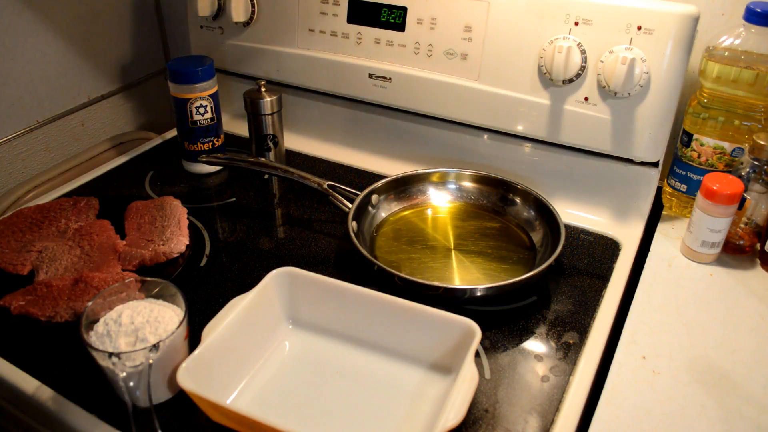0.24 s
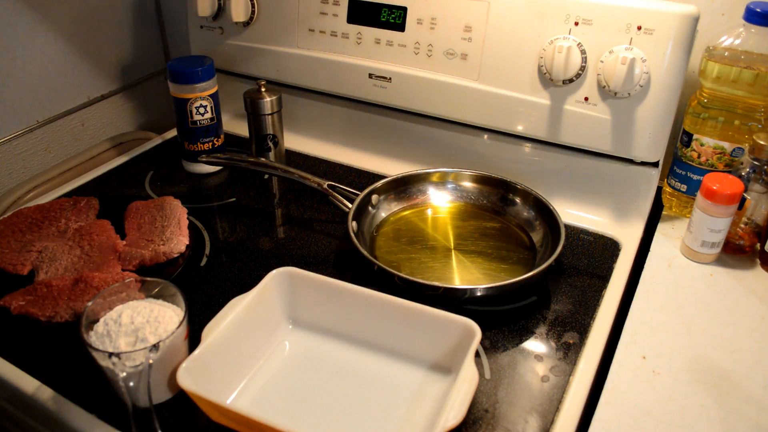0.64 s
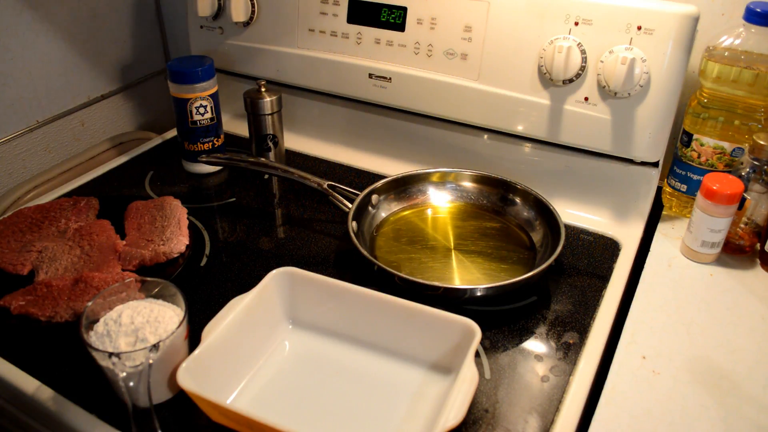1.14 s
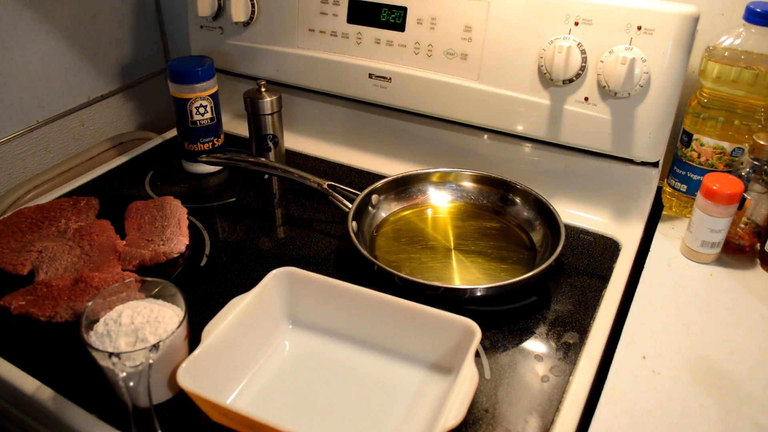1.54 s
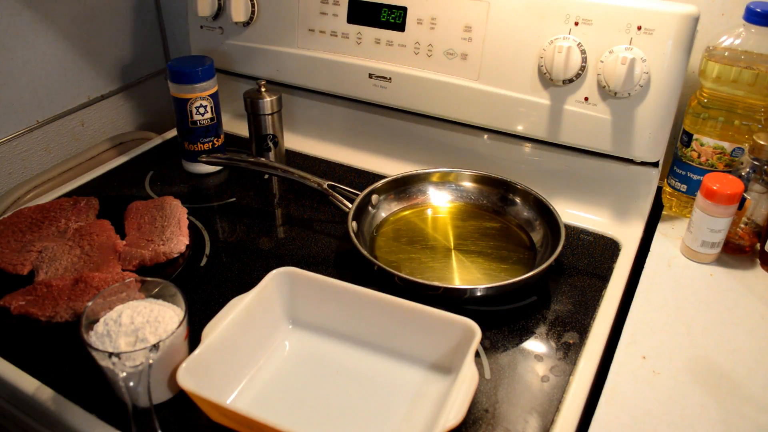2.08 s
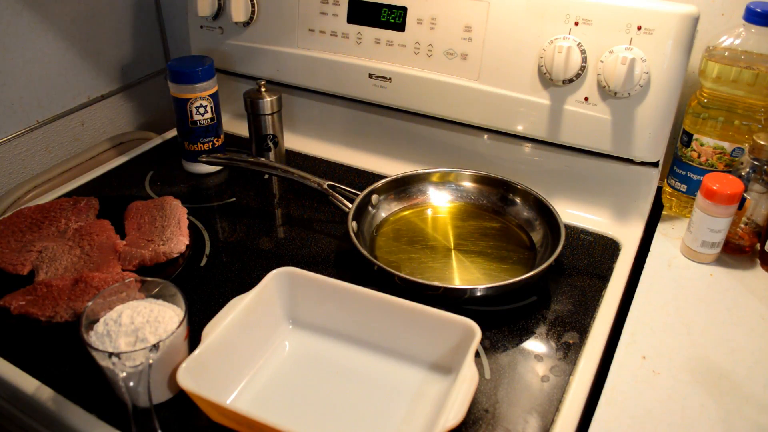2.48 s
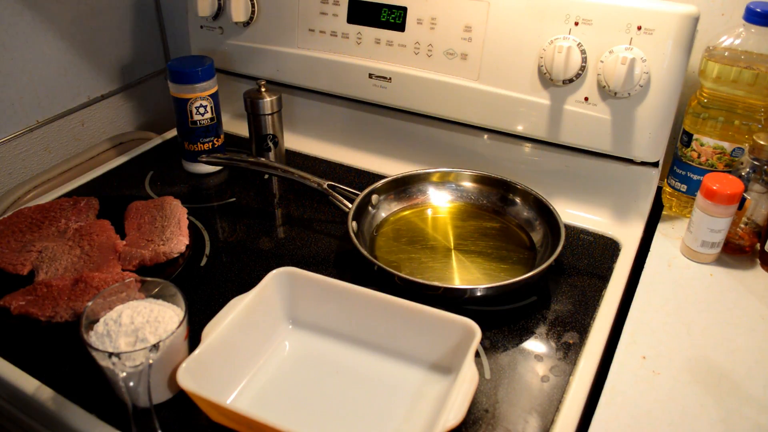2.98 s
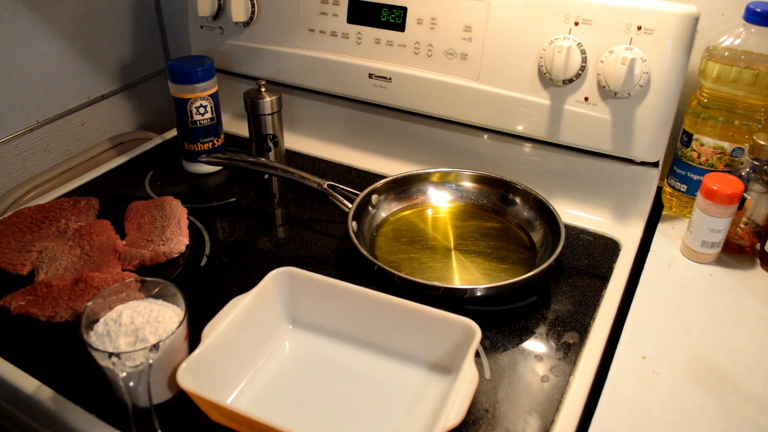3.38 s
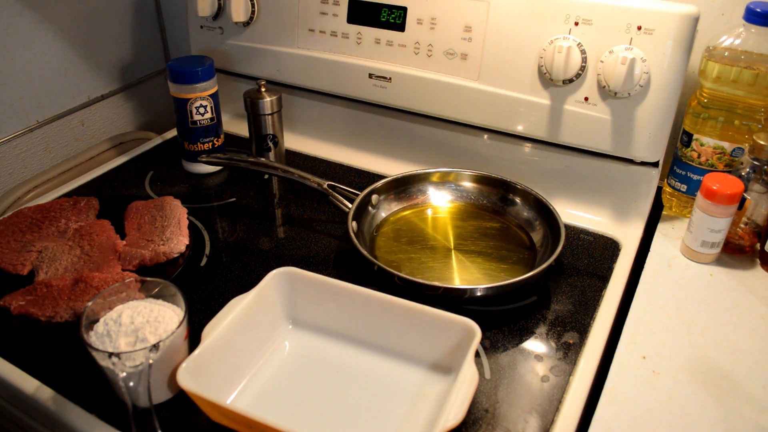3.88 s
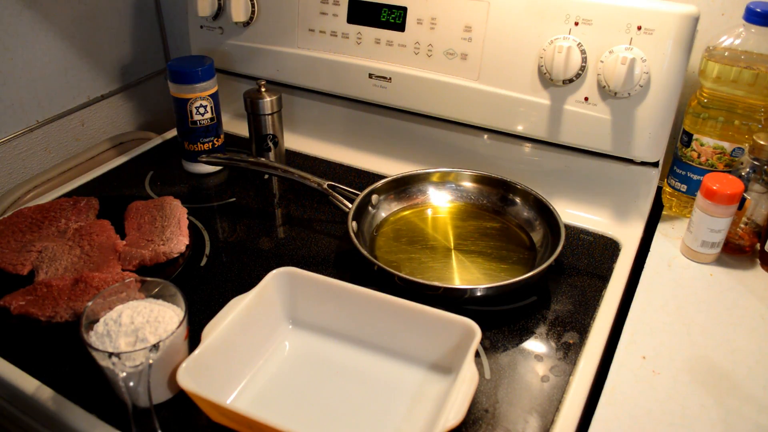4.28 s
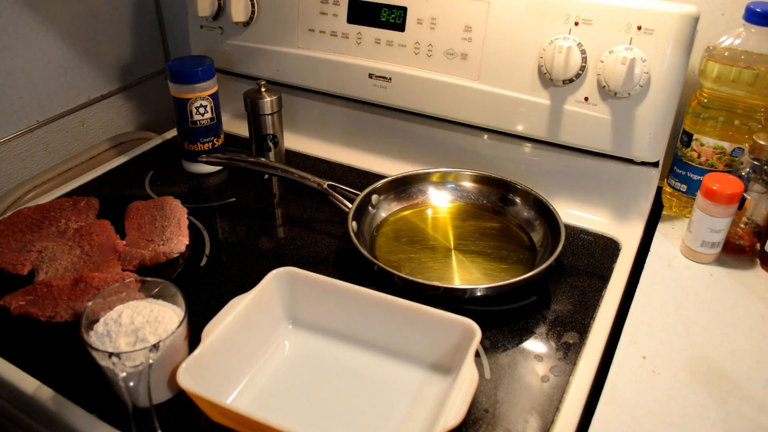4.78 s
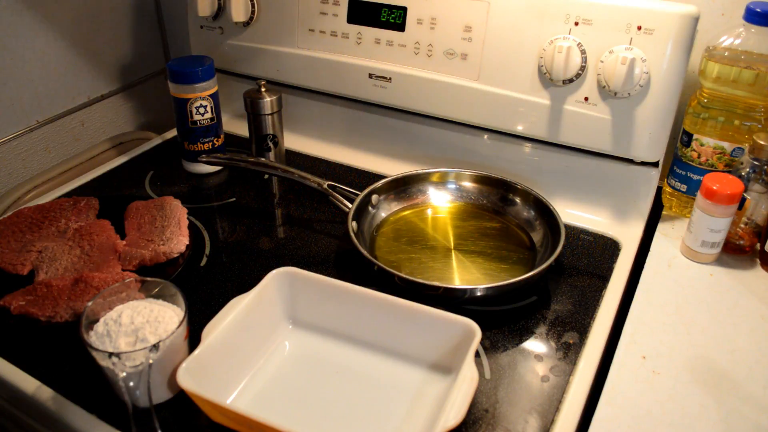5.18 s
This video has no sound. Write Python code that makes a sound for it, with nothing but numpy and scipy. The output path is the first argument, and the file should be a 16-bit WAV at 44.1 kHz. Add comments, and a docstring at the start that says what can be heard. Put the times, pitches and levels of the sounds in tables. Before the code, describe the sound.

A low appliance hum with a very faint hiss runs throughout a small, hard-surfaced kitchen. From 0 to 1.5 s a hand or cloth brushes in short strokes and a drawer rolls open with soft rumbling and dull wooden bumps, plus one faint clink near 0.9 s. After a short lull, cutlery crashes at about 1.83 s: dense, bright steel clatter with wooden knocks, loudest near 1.9 s and slightly distorted, jangling on until 2.3 s. Another tangle of clinks and knocks comes from 2.55 to 2.8 s. At 3.13 s a utensil is laid down with a dull double tap. Harder clacks on wood follow at 3.37, 3.54 and 3.78 s, then a sharp tick at 4.07 s and lighter, ringing clinks until 4.3 s. A faint deeper hum joins around 4 s. From 4.7 s only gentle rubbing and small dry ticks remain, close to the microphone.

```python
"""A small, hard kitchen where an appliance hums: a hand brushes about, a cutlery drawer rolls open, and
forks and spoons are stirred, dropped and knocked against its wooden tray.
Noise bursts and random tiny contacts drive steel and wood resonances; shaped noise makes the hum, hiss
and cloth. Sparse echoes add the room, and the loudest crash overloads."""
import sys
import numpy as np
from scipy import signal
from scipy.fft import rfft, irfft, next_fast_len
from scipy.io import wavfile

SR = 44100
rng = np.random.default_rng(int(sys.argv[2]) if len(sys.argv) > 2 else 0)


def file_out(sig):
    """Save sig as 16-bit WAV at sys.argv[1]."""
    # one column per channel
    cols = np.atleast_2d(sig).T
    # limit, then scale
    lim = np.clip(cols, -1, 1)
    pcm = np.round(lim * 32767).astype(np.int16)
    wavfile.write(sys.argv[1], SR, pcm)


N = 239264

# All source levels are relative: the functions below trim them in the mix.
# Appliance hum spectrum. Each row: frequency in Hz, density in relative dB per Hz.
HUM_SPECTRUM = [(12, -55), (20, -18.5), (87, -2.5), (124, -10.5), (181, -2), (393, -5.5), (427, -10),
                (663, -8), (736, -12.5), (1030, -9.5), (1270, -15.5), (3000, -26.5), (3900, -64),
                (6600, -120)]
# Faint steady hiss spectrum. Each row: frequency in Hz, density in relative dB per Hz.
AIR_SPECTRUM = [(1760, -35), (3000, -11), (3510, -4.5), (4890, -12.5), (9260, -14), (9980, -13.5),
                (11000, -17), (15500, -22.5)]
HUM_DB, AIR_DB = -45.5, -60.5
LATE_HUM_HZ, LATE_HUM_WIDTH_HZ, LATE_HUM_DB = 95.5, 4.6, -58
LATE_HUM_FROM_S, LATE_HUM_RISE_S = 3.9, .4
# Decay of the room. Each row: frequency in Hz, time to fall 60 dB in seconds.
ROOM_DECAY = [(200, 0.26), (1000, 0.25), (4000, 0.26), (10000, 0.2), (15000, 0.25)]

# Soft strokes of hand and cloth, and the drawer's roll. Each row: top in seconds, hiss level in dB,
# build-up in ms per 20 dB, fading in ms per 20 dB, hold in ms, rumble against hiss in dB, brightness in dB.
RUBS = [(0.076, -42.5, 18, 140, 1, -4, -4.5), (0.239, -34, 54, 162, 1, -10, -3.5),
        (0.365, -53, 40, 47, 7.8, -8, 7), (0.44, -34.5, 29, 29, 50, -27, 1.5),
        (0.56, -64.5, 60, 60, 120, 18.5, 2), (0.69, -39.5, 8, 100, 20, -2, -7),
        (0.74, -44, 28, 150, 30, 6.5, -6), (0.866, -31.5, 48, 198, 1, 3.5, -2.5),
        (0.9, -40, 67, 120, 257, 9, 2), (1.22, -40, 86, 64.5, 237, 7.5, 2.5),
        (1.5, -51, 40, 57, 32, -2, 1.5), (4.7, -62, 20, 60, 18, -11, 4), (4.77, -56.5, 42, 60, 97, -9.5, 4),
        (4.886, -40.5, 64, 29, 0.89, -4.5, -10.5), (5.014, -40.5, 107, 34, 1, -18, -7.5),
        (5.067, -41.5, 22, 90, 11, -25, -1), (5.156, -47.5, 26, 100, 1, 3, 3),
        (5.35, -48.5, 192, 48, 1, -8, -7)]
# Bright spectrum of rubs, ticks and scuffs. Each row: frequency in Hz, density in relative dB per Hz.
SWISH = [(530, -35), (900, -35.5), (1200, -1), (2360, -2.5), (3180, -2), (3540, -2), (4770, -2.5),
         (7150, -7), (10100, -4), (15500, -33.5)]
# A utensil is laid down and rocks once. Each row: time in seconds, level in dB, chatter decay in ms.
SET_DOWN = [(3.129, -23, 19.2), (3.159, -26.5, 6.4)]
# Modes of that utensil and the worktop. Each row: frequency in Hz, width of one filter pass in Hz, level in dB.
LAID_MODES = [(282, 42, 5), (429, 220, 6), (735, 55, -7), (1223, 230, -3), (2750, 120, -8.5),
              (3000, 250, -6)]
# Small dry ticks of things touching. Each row: start in seconds, level in dB,
# scuff against tick in dB, scuff decay in ms.
TICKS = [(0.6864, -48, -12, 12), (1.0342, -24.5, -9.5, 15), (1.832, -13, -11, 6.8), (2.145, -19, -3.5, 7.4),
         (3.3654, -22, -16, 21), (3.444, -23, -10, 8.7), (3.5365, -13, -10, 4.3), (3.74, -25.5, -12, 12),
         (4.0742, -9.5, -21, 10.0), (4.6894, -42.5, -10, 11), (4.749, -40.5, -15, 18),
         (4.8657, -29, -10, 5.7), (4.9485, -36, -11, 10.0), (5.006, -37, -7, 8.4), (5.0624, -28.5, -10, 7),
         (5.1553, -19, -12, 6), (5.3283, -37, -10, 11)]
# Pushes through the heap. Each row: top in seconds, steel rattle in dB, build-up in ms per 20 dB
# (at least 1 is used), settling in ms per 20 dB, hold in ms, tray rumble against rattle in dB.
STIRS = [(1.838, -21, 5.5, 105, 24, 2.5), (1.895, -2.5, 22, 92, 7.2, -10.5), (1.982, -18, 24, 110, 99, -6),
         (2.162, -26.5, 12, 83, 63, -2.5), (2.274, -19.5, 22, 78, 7.9, -7.5),
         (2.55, -24.5, 6.5, 99, 58, 0.5), (2.628, -15, 45, 117, 3.8, -5.5),
         (3.372, -26.5, -3, 158, 5.4, -2), (3.545, -28, 28, 150, 5, -19),
         (3.784, -9.5, 33.5, 76, 3.2, -6.5), (4.011, -28, 31, 48, 5, -10), (4.084, -29.5, 12, 100, 15, -25),
         (4.147, -20, 19, 111, 5.4, -14), (4.274, -33, 39, 46.5, 5, -19)]

# Blows on the wooden tray. Each row: time in seconds, level in dB, panel pitch in Hz,
# panel share in dB, chatter decay in ms.
KNOCKS = [(0.069, -27, 305, 1, 20), (0.724, -31, 470, 5, 11), (0.84, -29.5, 165, 8.5, 38),
          (0.867, -29, 270, 11, 19), (1.042, -23, 480, -3, 23), (1.115, -27.5, 450, 2.5, 36),
          (1.159, -34.5, 950, 7, 10), (1.271, -21, 694, -3, 8.4), (1.832, -21.5, 476, 2.5, 13),
          (1.91, -7.5, 743, 8.5, 3.7), (2.145, -22, 870, 10, 14), (2.231, -13.5, 810, 7.5, 7.6),
          (2.555, -13, 447, -21, 7.6), (2.591, -15.5, 851, 5, 8), (2.629, -15, 760, 11.5, 7.2),
          (2.719, -20.5, 820, 6, 5.6), (3.368, -12, 564, -8, 7.7), (3.442, -13.5, 430, -13, 12.3),
          (3.536, -6, 493, -15, 12), (3.636, -21, 505, -9, 16.6), (3.774, -7, 452, -14, 7.9),
          (3.828, -38, 519, -3, 7), (3.902, -30, 940, 3, 18), (3.998, -23.5, 493, -3, 8.8),
          (4.075, -19, 830, -1, 11.7), (4.14, -26, 730, 0, 12), (4.262, -14.5, 780, 1.5, 7.5)]
# Tray board modes. Each row: frequency in Hz, width in Hz (at least 70 is used), level in dB.
TRAY_MODES = [(198.4, 30, -10.5), (470, 33, 30), (851, 320, 13.5), (1740, 38, -11.5), (1950, 19, 8),
              (2160, 29, -21)]
# Dull thud spectrum. Each row: frequency in Hz, density in relative dB per Hz.
WOOD = [(53, -63.5), (90, -26.5), (199, -1.5), (319, -10.5), (498, 0.5), (588, -6.5), (845, -0.5),
        (1390, -9), (2500, -17.5), (3250, -27), (5500, -120)]
# Steel on steel. Each row: time in seconds, level in dB, small piece's pitch in Hz and ring in dB,
# large piece's pitch in Hz and ring in dB, handle pitch in Hz, clack in dB, chatter decay in ms.
CLINKS = [(0.8616, -24.5, 9640, 3.5, 3900, -13, 1570, -5, 16),
          (1.8388, -11, 9600, 9, 4330, -11, 1980, -11, 11),
          (1.8557, -5.5, 10490, -3, 5200, -17, 2160, -10, 36),
          (1.8926, -7, 9560, 10, 6960, -2, 2130, -3.5, 36),
          (1.93, -2.5, 10900, 7.5, 7640, -1, 1800, -9.5, 13),
          (1.9638, -14, 11000, -4, 7900, -6, 1970, -20, 7.3),
          (2.029, -6, 10300, -1, 6100, -12, 1860, -13, 17.5),
          (2.0744, -10.5, 9700, -12, 6150, -20, 1530, -14, 26),
          (2.155, -7, 10200, -8, 6000, -9, 1900, -15.5, 11),
          (2.204, -18, 10100, -12, 7600, -9.5, 2020, -2, 70),
          (2.2674, -18.5, 10450, 8, 6800, -14, 1970, -26, 18),
          (2.5537, -11, 9400, 3, 6200, -15, 1750, -9.5, 23.5),
          (2.5798, -14, 10340, 2.5, 5880, -6, 1600, -19, 26),
          (2.612, -8, 11260, -6, 7300, -12, 1800, -10.5, 27),
          (2.6494, -14.5, 9870, 7, 4910, -24, 1340, -5, 14),
          (2.699, -21, 10340, 2, 4870, -23, 1310, -13, 28),
          (2.7581, -23.5, 10140, 3.5, 8650, -8, 1320, -12, 16.6),
          (3.368, -12.5, 10900, -17, 4700, -9, 2000, 3.5, 10),
          (3.3802, -11, 11800, -9, 3800, -8, 1710, -7, 10),
          (3.458, -18.5, 9360, -7, 6740, -9, 1680, 1.5, 18.7),
          (3.5422, -12, 10300, -3, 6000, -14, 1540, -7.5, 25.5),
          (3.6877, -27, 10700, 1, 4700, -13, 1530, -10, 8.4),
          (3.7452, -31, 10700, -8, 5200, -18, 3170, -7, 34),
          (3.7788, -7.5, 10300, 3, 4330, -15, 1390, -6, 23),
          (3.9104, -21, 9900, -7.5, 5150, -18, 1770, -7.5, 23.6),
          (3.9992, -20, 10100, 2.5, 5330, -13, 1530, -12.5, 12),
          (4.0757, -14, 10070, -4, 5870, -13, 2360, -10.5, 30),
          (4.142, -15.5, 9960, 11.5, 5200, -2, 1850, -35, 20),
          (4.1991, -25.5, 10200, 6, 5380, 2.5, 3020, -22, 16),
          (4.265, -20, 10000, 0.5, 5130, -5, 1380, -30, 14.7)]
# Modes of the cutlery heap. Each row: frequency in Hz, width in Hz (struck heap: at least 95;
# the jangle sets its own), level in dB.
STEEL_MODES = [(3500, 100, -17.5), (4010, 150, -3), (4970, 60.2, -2), (5550, 30, -26.5), (5610, 10, -4),
               (6100, 91, -3), (7220, 23, -16.5), (7610, 74, -21.5), (7660, 66, 3), (8200, 30, -4),
               (9380, 20, -1.5), (10300, 99, -18.5), (10900, 36, -13.5), (11630, 74, 1), (12500, 39, -4.5),
               (12500, 44, -13), (13450, 83, -21), (14260, 28, -29), (14800, 140, -39.5)]
# Bright crack spectrum. Each row: frequency in Hz, density in relative dB per Hz.
CRACK = [(710, -36.5), (1200, -7.5), (2140, -2), (2330, -26), (2570, -4), (4340, -4.5), (7810, -4.5),
         (8420, -0.5), (9080, 3), (10200, -1.5), (15500, -31)]
# Modes of a fork or spoon. Each row: multiple of its pitch, level in dB.
PIECE_MODES = [(1.1, -11.5), (1.0, -0.5), (0.78, -14)]
EDGE_HZ = 15680  # top of the final band


def gain_of(db):
    """Decibels to a factor."""
    return 10 ** (np.asarray(db) / 20)


def evened(x):
    """Scales to rms 1."""
    return x / np.sqrt(np.mean(x ** 2) + 1e-20)


def read(points, hz):
    """A table's value at hz, interpolated along log frequency."""
    f, value = np.transpose(points)
    return np.interp(np.log(hz + 1), np.log(f + 1), value)


def coloured(x, spectrum):
    """Shapes x by a spectrum; white input keeps its power."""
    size = next_fast_len(len(x))
    shape = evened(gain_of(read(spectrum, np.fft.rfftfreq(size, 1 / SR))))
    return irfft(rfft(x, size) * shape, size)[:len(x)]


def resonate(x, hz, width):
    """A two-pole mode, damped by its width in Hz; white input keeps its power."""
    r = np.exp(-np.pi * max(width, 3) / SR)
    y = signal.lfilter([1, 0, -1], [1, -2 * r * np.cos(2 * np.pi * hz / SR), r * r], x)
    return y * np.sqrt((1 - r * r) / 2)


def low_pass(x, hz):
    """Second-order treble loss."""
    return signal.lfilter(*signal.butter(2, hz, fs=SR), x)


def grit(per_s, spread_db):
    """Random tiny contacts of uneven size."""
    size = gain_of(spread_db * np.minimum(rng.exponential(1, N), 4)) * rng.choice([-1., 1.], N)
    return evened(size * (rng.random(N) < per_s / SR))


def burst(chatter_ms, rise_ms, tick_db):
    """A first tick, then quick rebounds blurred into noise that swells and dies away."""
    ms = np.arange(round(.25 * SR)) / SR * 1000
    swell = 1 - np.exp(-ms / max(rise_ms, .1))
    decay = np.exp(-ms / max(chatter_ms, 1))
    return rng.standard_normal(len(ms)) * swell * decay + gain_of(tick_db) * (ms == 0)


def add(mix, s, sound):
    """Adds a sound at s seconds."""
    part = mix[round(s * SR):][:len(sound)]
    part += sound[:len(part)]


def strokes(rows):
    """One envelope per row: straight slopes in dB around a held top."""
    ms = np.arange(N) / SR * 1000
    envelopes = []
    for s, db, up, down, held in rows:
        before = np.maximum((1000 * s - ms) / max(up, 1), 0)
        after = np.maximum((ms - 1000 * s - held) / max(down, 1), 0)
        envelopes.append(gain_of(db - 20 * before - 20 * after))
    return np.array(envelopes)


def summed(envelopes, db=0):
    """Adds envelopes by power, each shifted by its own dB."""
    return np.linalg.norm(envelopes * np.reshape(gain_of(db), (-1, 1)), axis=0)


def level_sum(modes):
    """Combined gain of a mode table, added by power."""
    return np.linalg.norm(gain_of([db for _, _, db in modes]))


def body(drive, modes, least_width, wander_db, wander_s):
    """Modes rung by a drive; contact points move, so each mode swells and fades on its own."""
    out, step = np.zeros(N), wander_s * SR
    for hz, width, db in modes:
        knots = rng.standard_normal(int(N / step) + 2)
        wander = np.interp(np.arange(N) / step, np.arange(len(knots)), knots)
        moving_drive = drive * evened(gain_of(wander_db * wander))
        out += gain_of(db) * resonate(moving_drive, hz, max(width, least_width))
    return out / level_sum(modes)


def tray(drive):
    """Drawer boards: a dull thud and short panel modes."""
    modes = body(drive, TRAY_MODES, least_width=70, wander_db=6, wander_s=.04)
    return gain_of(1.5) * coloured(drive, WOOD) + gain_of(-10.5) * modes


def steel(drive):
    """Cutlery: a bright crack and the heap's thin modes."""
    modes = body(drive, STEEL_MODES, least_width=95, wander_db=7, wander_s=.02)
    return gain_of(-3.5) * coloured(drive, CRACK) + gain_of(-15.0) * modes


def jangle(rattle, per_s, width):
    """Separate small contacts, each pinging one mode of the heap for a moment."""
    pings = np.zeros(N)
    for hz, _, db in STEEL_MODES:
        pings += gain_of(db) * resonate(rattle * grit(per_s, spread_db=3.0), hz, width)
    return pings / level_sum(STEEL_MODES)


def ring(x, hz, width):
    """A struck piece rings in a cluster: its nominal mode and two randomly detuned neighbours."""
    near = hz * (1 + 0.042 * rng.standard_normal(2))
    neighbours = sum(resonate(x, min(f, 15500), width) for f in near)
    return 0.38 * resonate(x, hz, width) + 0.55 * neighbours


def hum():
    """Appliance hum, low shaped noise swelling a little, over a faint steady hiss."""
    t = np.arange(N) / SR
    waves = [np.sin(2 * np.pi * (f * t + rng.random())) for f in np.geomspace(.3, 6, num=16)]
    swell = evened(sum(waves))
    hiss = gain_of(AIR_DB) * coloured(rng.standard_normal(N), AIR_SPECTRUM)
    return gain_of(HUM_DB + 0.15 * swell) * coloured(rng.standard_normal(N), HUM_SPECTRUM) + hiss


def late_hum():
    """A low hum comes in late and wavers, as noise through a narrow resonance does."""
    fade_in = np.clip((np.arange(N) / SR - LATE_HUM_FROM_S) / LATE_HUM_RISE_S, 0, 1)
    tone = resonate(rng.standard_normal(N), LATE_HUM_HZ, LATE_HUM_WIDTH_HZ)
    return gain_of(LATE_HUM_DB) * fade_in * tone


def kitchen(x):
    """Sparse echoes of random sign, each band dying at its own speed."""
    taps = np.zeros(SR // 2)
    at = np.arange(200, len(taps) - 12, 12)  # one echo at a random place in every 12 samples
    taps[at + rng.integers(0, 12, len(at))] = rng.choice([-1., 1.], len(at))
    hz, t, bands = signal.stft(taps, SR, nperseg=256)
    t60 = np.maximum(read(ROOM_DECAY, hz), .02)[:, None]
    tail = signal.istft(bands * gain_of(-60 * t / t60), SR, nperseg=256)[1]
    return signal.fftconvolve(x, tail / np.linalg.norm(tail))[:N]


def rubbing():
    """Hand, cloth and drawer runners: fine hiss above, the boards rumbling below."""
    rubs = strokes([row[:5] for row in RUBS])
    rumble_db, bright_db = np.transpose(RUBS)[5:]
    swish = coloured(grit(12000, spread_db=-1.5), SWISH)
    dull = low_pass(swish, 5000)
    hiss = summed(rubs) * dull + summed(rubs, bright_db) * (swish - dull)
    rumble = tray(summed(rubs, rumble_db - 7.0) * grit(2500, spread_db=3.5))
    return gain_of(-3.0) * hiss + rumble


def set_down():
    """The utensil's modes stand clear of each other, over the worktop's thud and a faint bright edge."""
    blows, rung = np.zeros(N), np.zeros(N)
    for s, db, chatter_ms in SET_DOWN:
        add(blows, s - .0025, gain_of(db - 9.5) * burst(chatter_ms, rise_ms=0.97, tick_db=1))
    size = np.linalg.norm(blows)
    for hz, width, db in LAID_MODES:
        mode = resonate(resonate(blows, hz, width), hz, width)  # twice: steep flanks
        rung += gain_of(db) * size * mode / np.linalg.norm(mode)
    edge, thud = coloured(blows, SWISH), coloured(blows, WOOD)
    return gain_of(-9) * edge + gain_of(0.5) * rung + gain_of(4.5) * thud


def ticks():
    """A single hard click, trailed by a short noisy scuff."""
    out = np.zeros(N)
    for s, db, scuff_db, scuff_ms in TICKS:
        add(out, s, gain_of(db + 4 + scuff_db) * burst(scuff_ms, rise_ms=5.5, tick_db=-scuff_db))
    return coloured(out, SWISH)


def stirring():
    """Pieces slide over each other, ping, and drag along the tray."""
    pushes = gain_of(-6.5) * strokes([row[:5] for row in STIRS])
    rattle = summed(pushes)
    drag = summed(pushes, [row[-1] for row in STIRS])
    slide = steel(rattle * grit(7700, spread_db=4.5))
    pings = gain_of(-6.5) * jangle(rattle, per_s=35, width=80)
    return slide + pings + tray(drag * grit(900, spread_db=2.5))


def knocks():
    """Each knock sounds the whole tray and the panel that was hit; wood swallows the panel's treble."""
    boards, panel = np.zeros(N), np.zeros(N)
    for s, db, hz, panel_db, chatter_ms in KNOCKS:
        blow = gain_of(db - 5.5) * burst(chatter_ms, rise_ms=4.0, tick_db=9)
        add(boards, s - .0015, blow)
        add(panel, s - .0015, gain_of(panel_db) * resonate(blow, hz, .18 * hz))
    return tray(boards) + low_pass(panel, 2000)


def clinks():
    """Each blow shakes the heap, rings both pieces that met, and clacks a thick handle."""
    heap, pieces = np.zeros(N), np.zeros(N)
    for s, db, small_hz, small_db, large_hz, large_db, handle_hz, clack_db, chatter_ms in CLINKS:
        start = s - .0015
        blow = gain_of(db - 9.0) * burst(chatter_ms, rise_ms=4.4, tick_db=8.0)
        # Thick parts speak at once, so the clack rises faster.
        clack = gain_of(db + clack_db - 14.0) * burst(1.02 * chatter_ms, rise_ms=0.49, tick_db=12)
        add(heap, start, blow)
        for pitch, ring_db in (small_hz, small_db), (large_hz, large_db):
            for times, mode_db in PIECE_MODES:
                hz = times * pitch
                add(pieces, start, gain_of(ring_db + mode_db) * ring(blow, hz, max(.009 * hz, 60)))
        handle = gain_of(0.5) * ring(clack, handle_hz, 150)
        add(pieces, start, handle + resonate(clack, 1800, 1300))
    return steel(heap) + pieces


def scene():
    """Everything handled sounds direct and through the room, over the two hums and the hiss."""
    handled = rubbing() + set_down() + ticks() + stirring() + knocks() + clinks()
    room = gain_of(-7.5) * kitchen(handled)
    return (hum() + late_hum() + room + gain_of(-0.5) * handled)[None]


def record(dry):
    """The input stage saturates near full scale; then the band limit."""
    full = dry / (1 + np.abs(dry / .9) ** 6) ** (1 / 6)
    band = signal.firwin(1023, EDGE_HZ, window=("kaiser", 11), fs=SR)
    return signal.oaconvolve(full, band[None], "same")


dry = scene()
out = record(dry)
file_out(out)
```